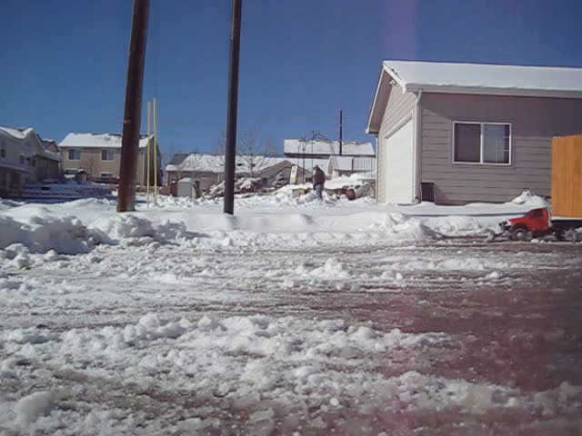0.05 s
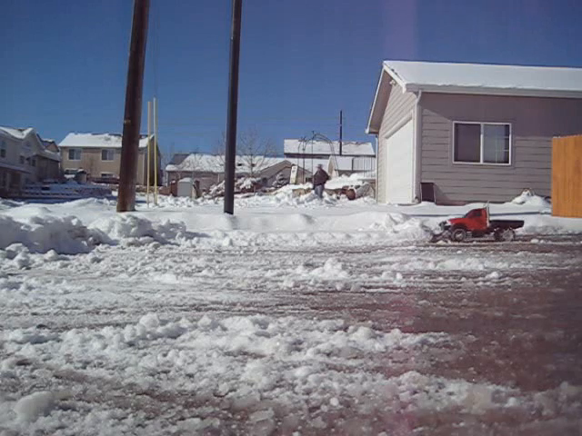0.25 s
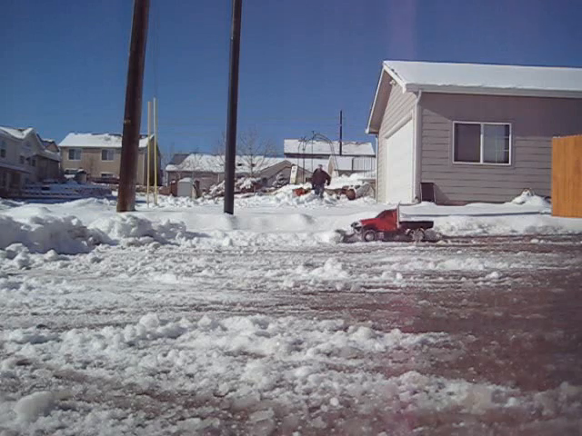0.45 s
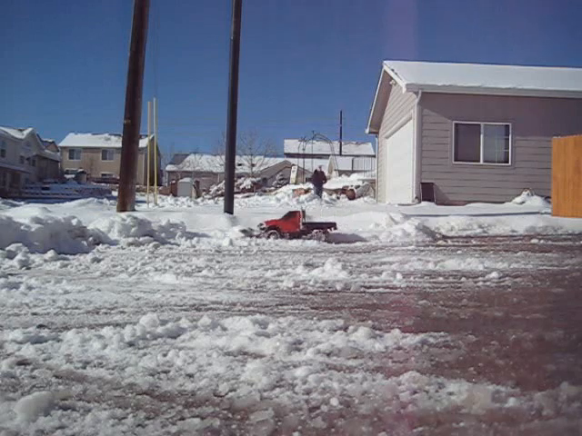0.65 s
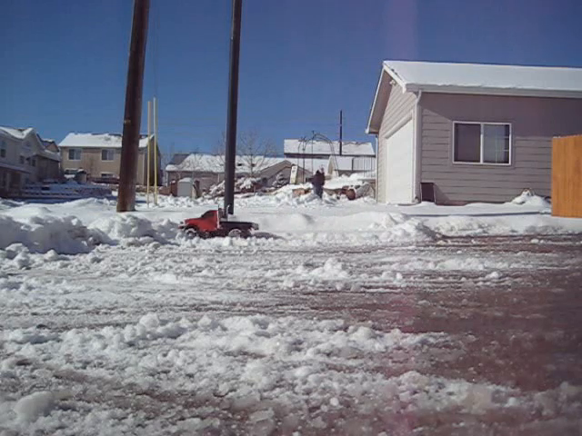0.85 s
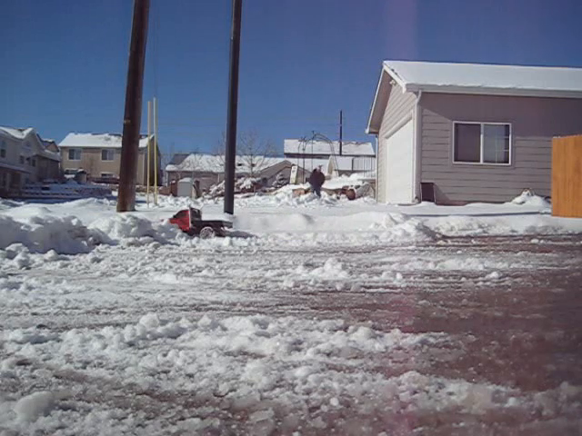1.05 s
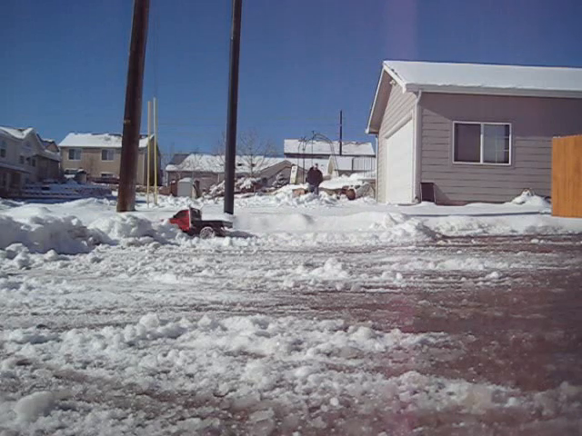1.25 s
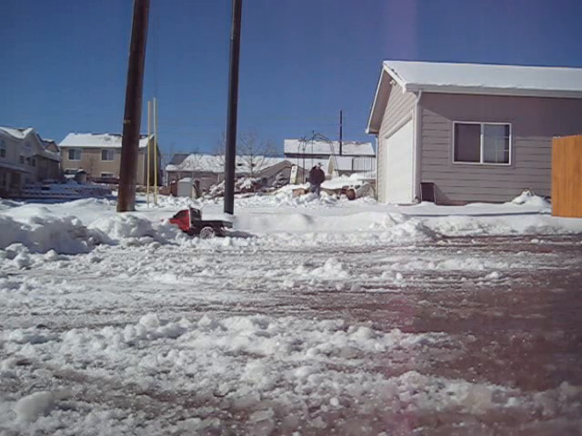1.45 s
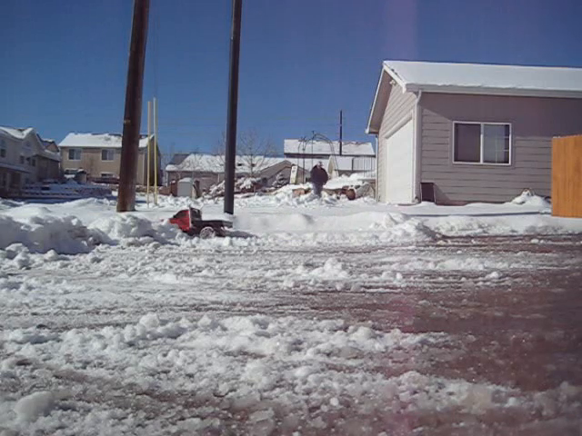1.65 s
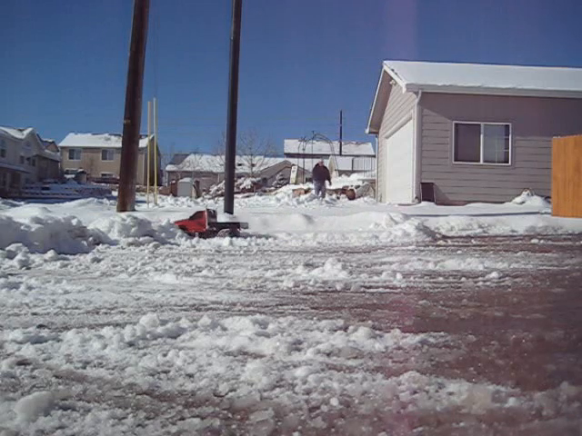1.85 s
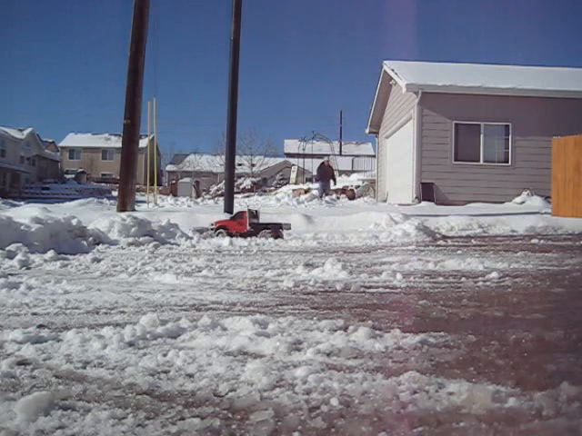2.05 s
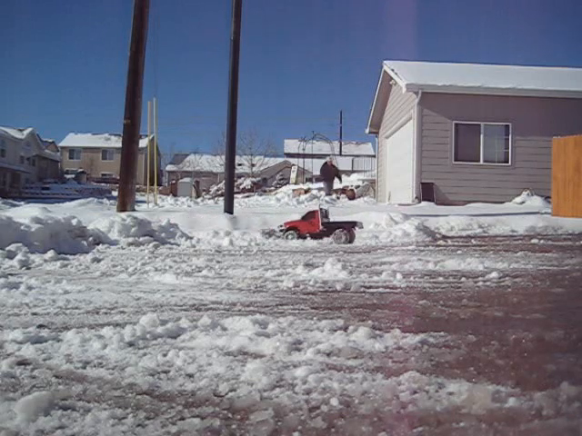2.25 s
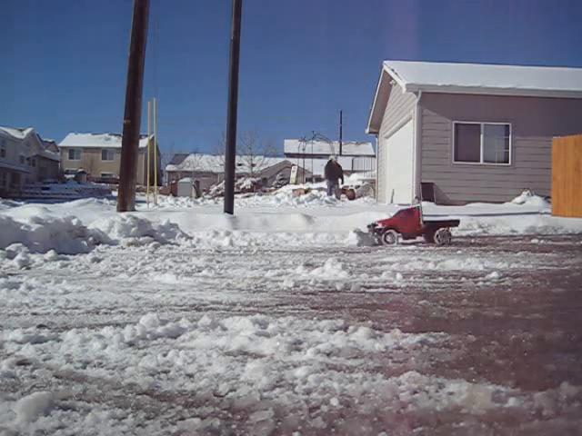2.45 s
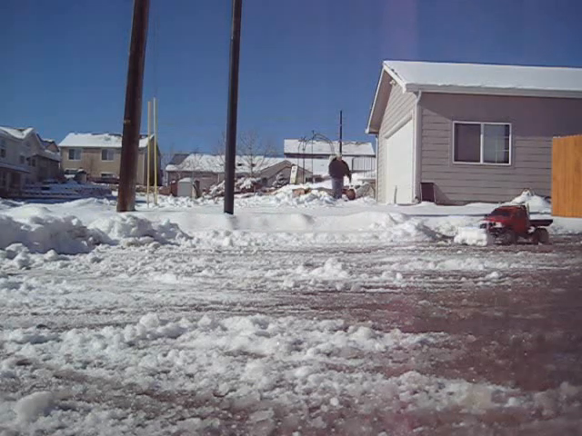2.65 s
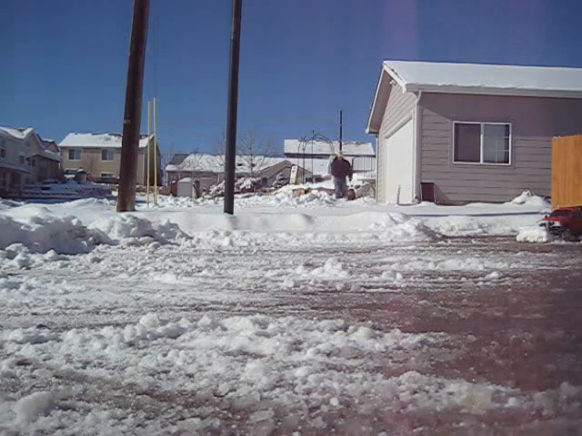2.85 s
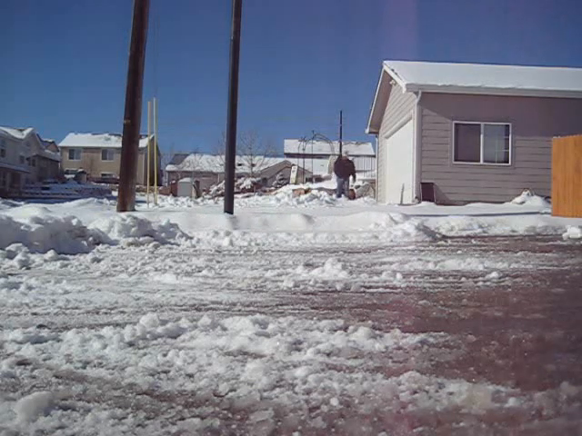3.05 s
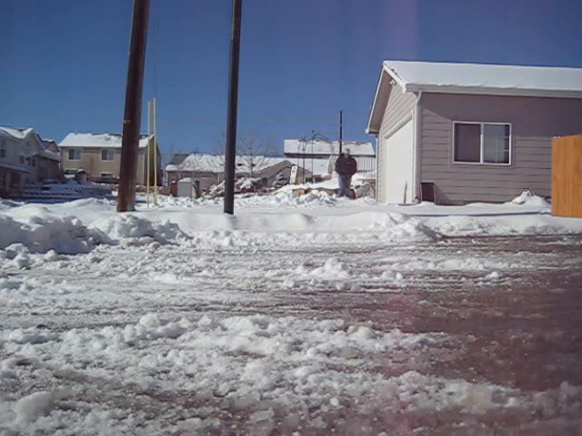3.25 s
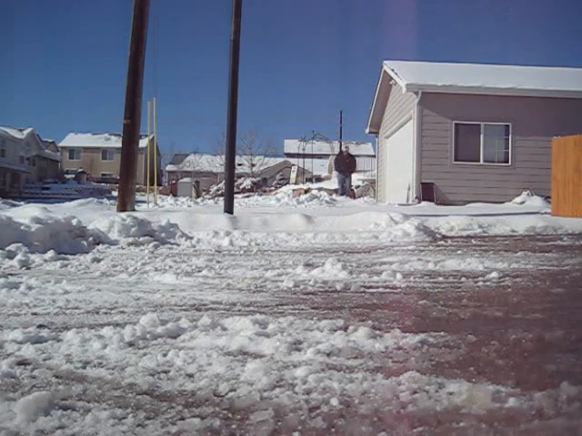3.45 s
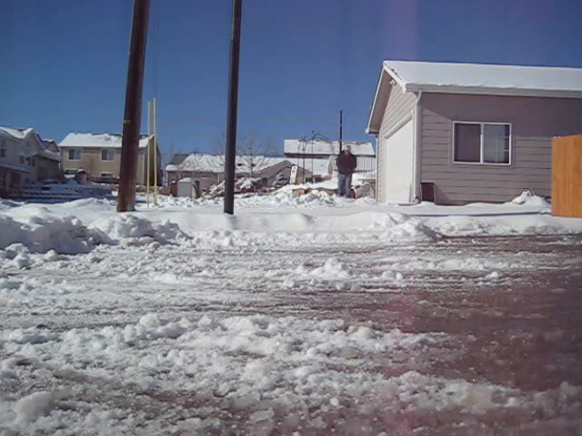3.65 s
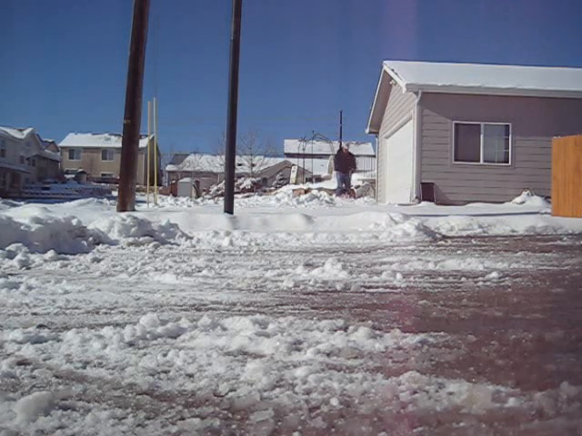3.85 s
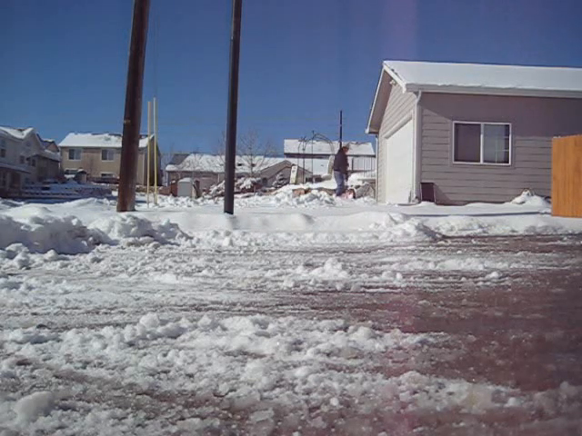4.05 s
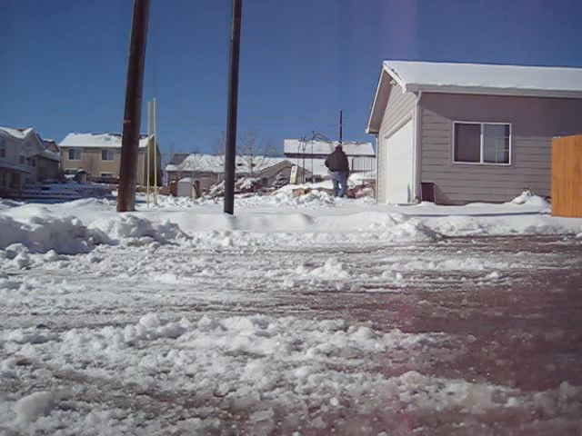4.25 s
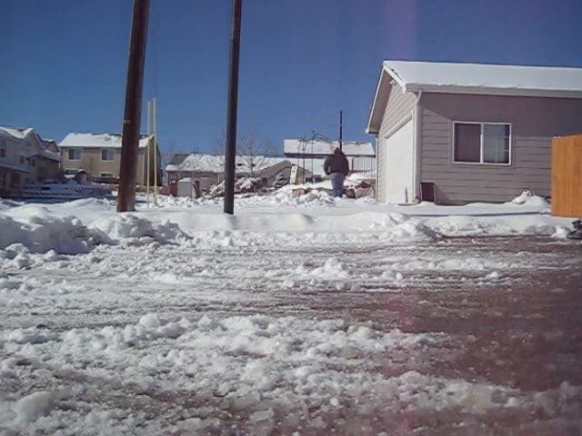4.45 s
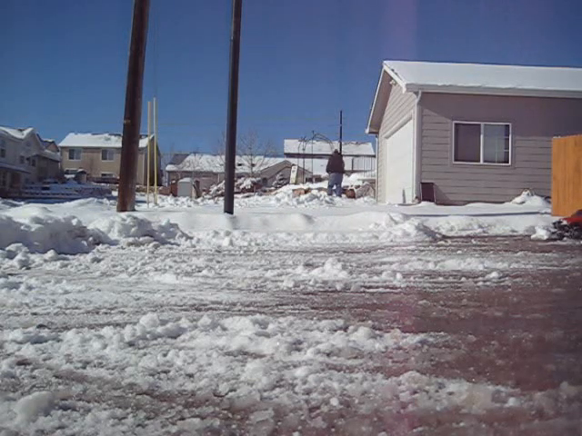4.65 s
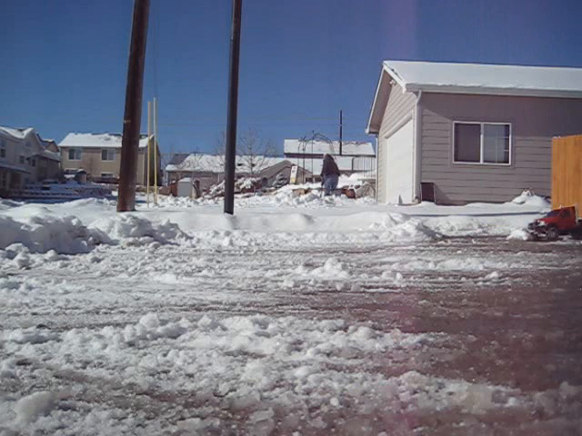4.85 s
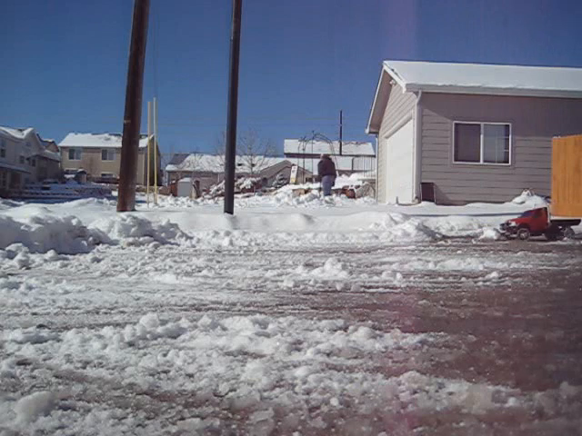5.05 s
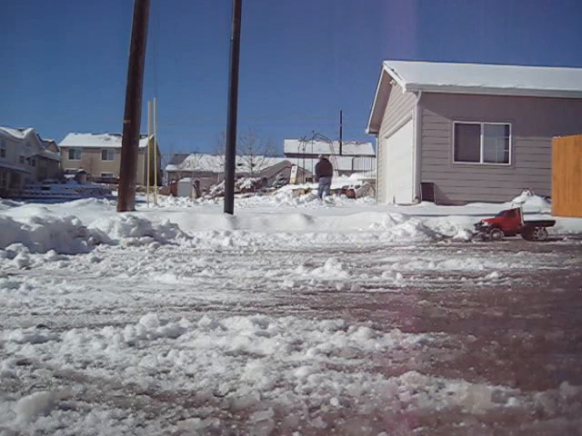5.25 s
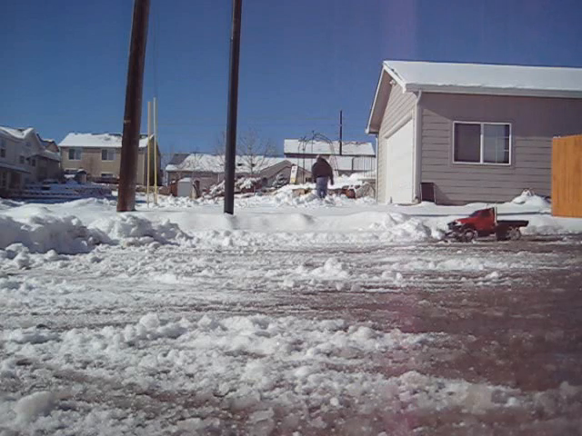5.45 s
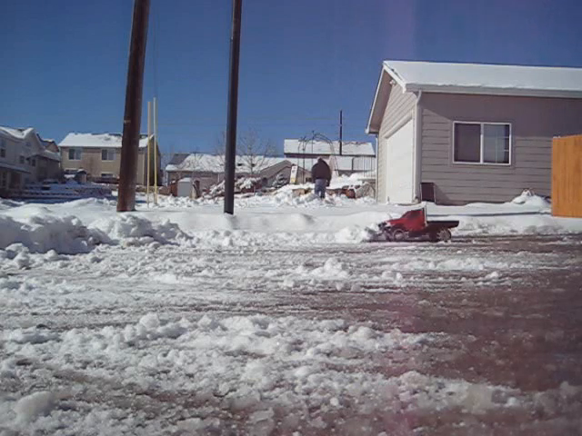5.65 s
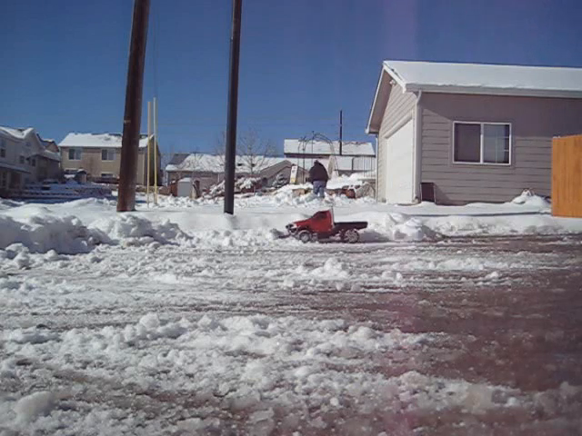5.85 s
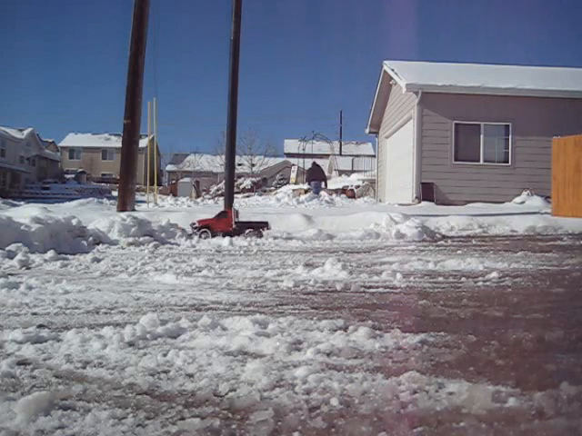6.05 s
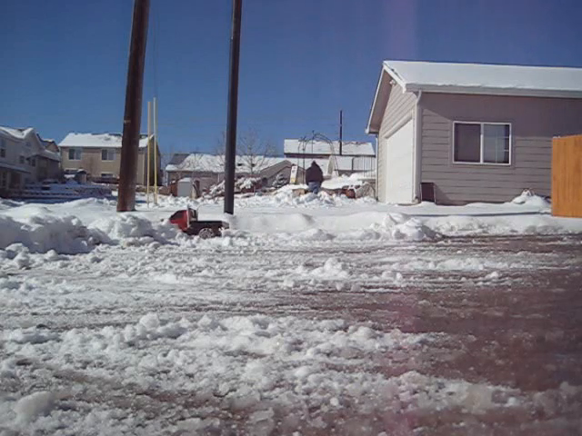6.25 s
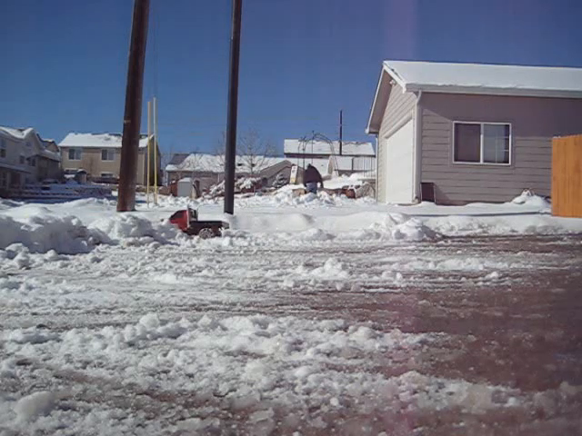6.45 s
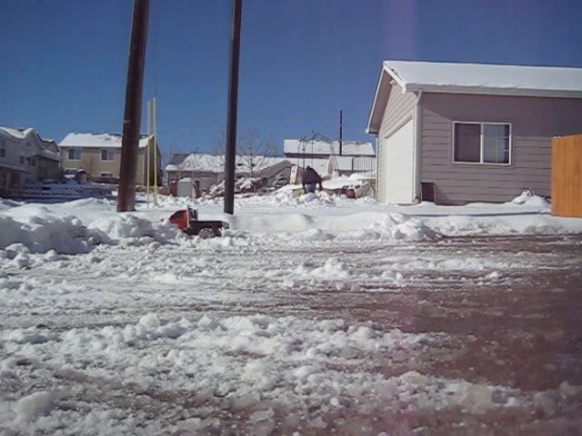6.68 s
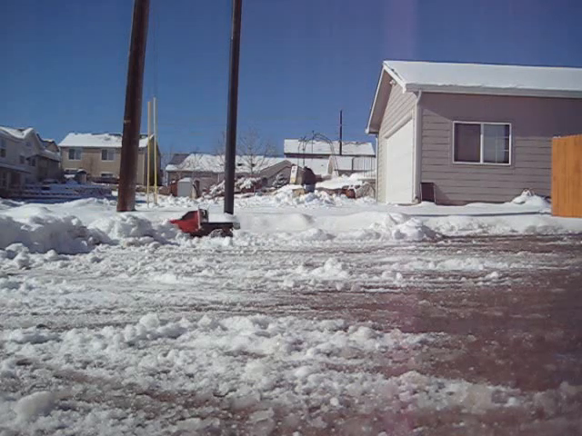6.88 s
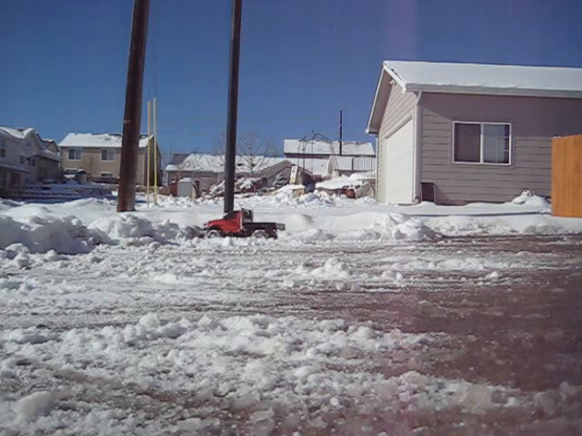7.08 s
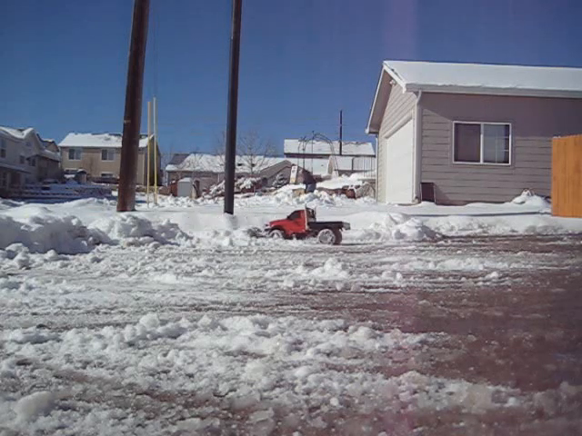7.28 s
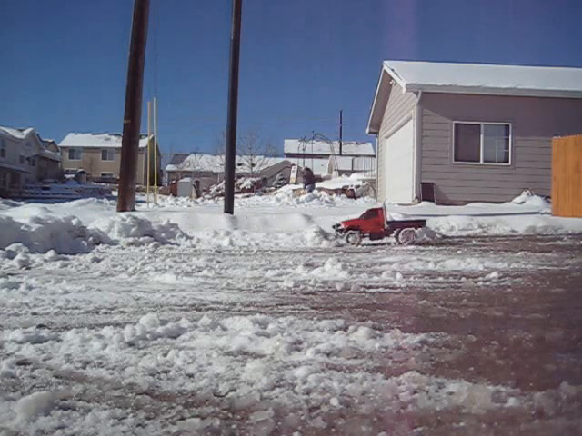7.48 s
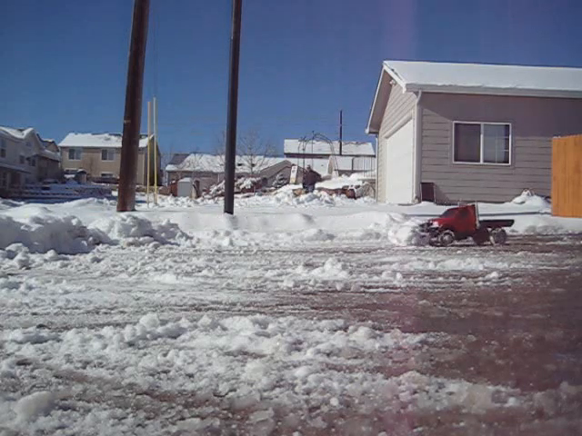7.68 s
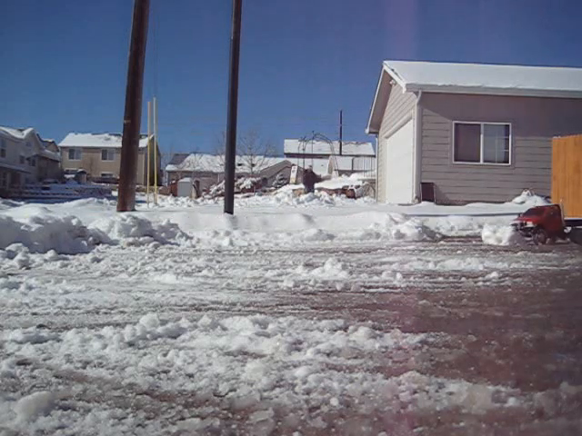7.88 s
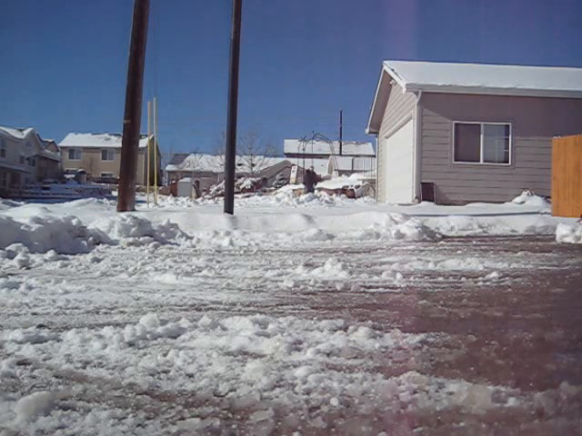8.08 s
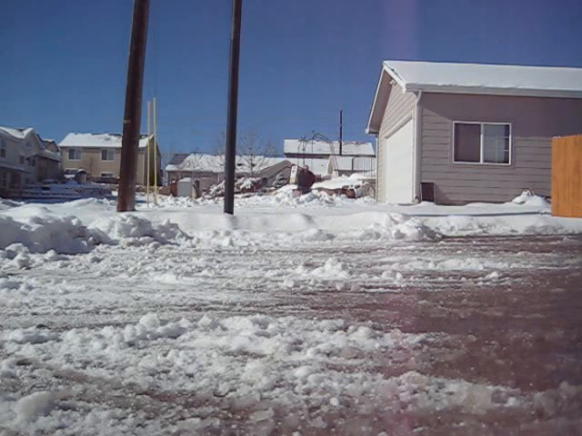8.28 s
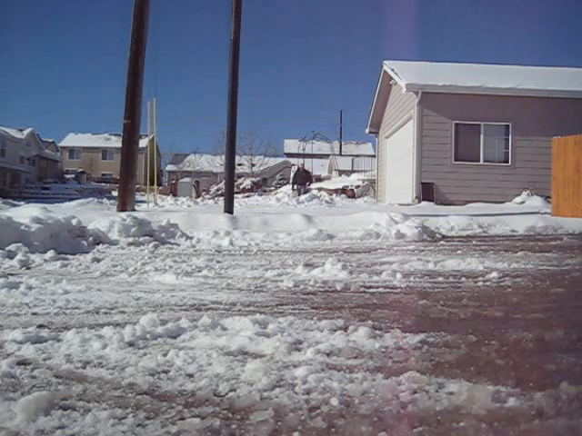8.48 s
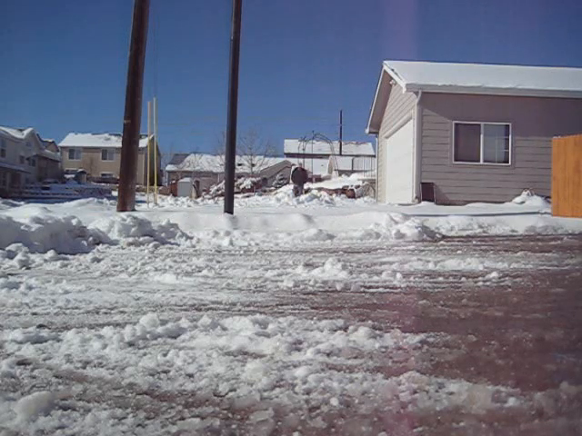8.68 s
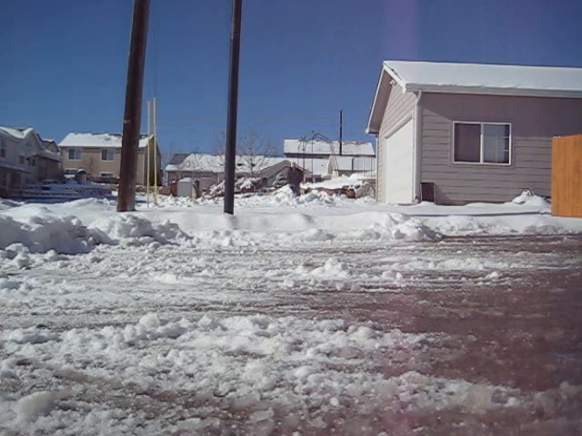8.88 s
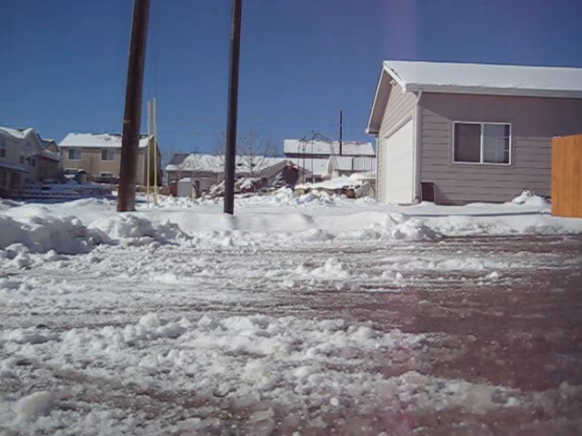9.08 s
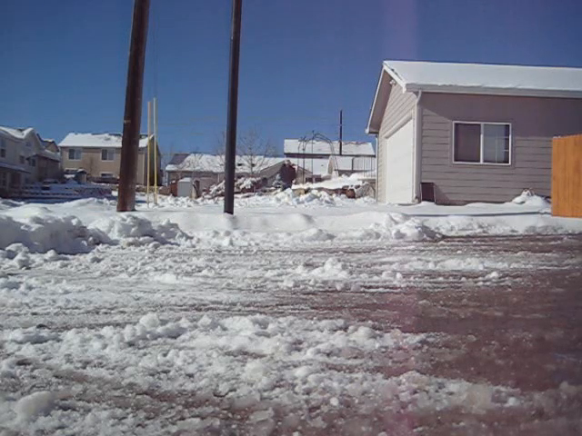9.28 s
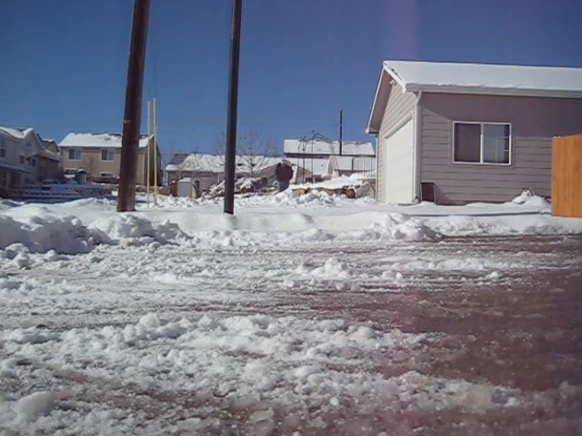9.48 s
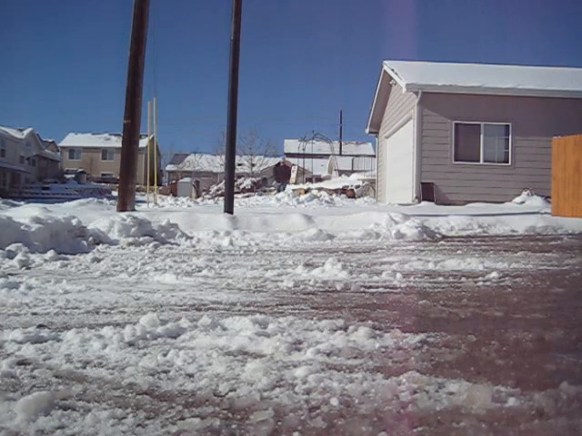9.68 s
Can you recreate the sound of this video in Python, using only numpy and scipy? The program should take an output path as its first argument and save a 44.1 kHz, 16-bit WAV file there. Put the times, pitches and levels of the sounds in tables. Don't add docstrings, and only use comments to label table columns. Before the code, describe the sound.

A small radio-controlled truck whines and rattles through icy slush in bursts, pushing, stopping, creeping with blade knocks, then reversing away over faint outdoor murmur.

```python
import sys
import numpy as np
from scipy import signal
from scipy.fft import rfft, irfft, next_fast_len
from scipy.io import wavfile

SR = 44100
rng = np.random.default_rng(int(sys.argv[2]) if len(sys.argv) > 2 else 0)


def wav_record(signal):
    frames = np.transpose(np.atleast_2d(signal))
    bounded = np.clip(frames, -1, 1)
    quanta = np.round(bounded * 32767).astype(np.int16)
    wavfile.write(sys.argv[1], SR, quanta)


def volts(x):
    e = np.asarray(x, float) / 20
    return 10 ** e


N = 428641
TIME = np.arange(N) / SR

# time in seconds, commutator rate in Hz, hum in dB as the load changes.
MOTOR_RUNS = [
    [(0.27, 830, -45), (0.394, 1260, -43), (0.556, 1345, -39), (0.886, 1330, -35), (1.002, 1252, -47),
     (1.04, 1140, -49)],
    [(1.76, 229.7, -80), (1.852, 990, -54), (1.9, 1075, -50), (2.104, 1179, -37.5), (2.452, 1299, -41),
     (3.072, 1285, -44), (3.126, 1231, -43), (3.266, 1301, -44), (3.5, 950, -46)],
    [(5.56, 644, -69), (5.602, 1030, -42), (5.74, 1306, -40), (6.064, 1357, -38), (6.2, 1215, -49)],
    [(6.88, 141, -67), (7.01, 890, -57), (7.05, 1094, -46), (7.208, 1232, -33), (7.27, 1114, -39),
     (7.285, 985, -53)],
    [(7.285, 1002, -53), (7.36, 990, -45), (7.45, 1229, -35), (7.55, 1245, -36.5), (7.7, 1205, -40),
     (7.76, 1108, -41), (7.85, 1145, -44), (8.17, 1165, -46), (8.185, 1035, -47)],
    [(8.185, 1035, -50), (8.235, 1040, -47), (8.265, 1135, -47), (8.526, 1168, -42), (8.605, 1140, -59),
     (8.615, 1040, -58), (8.665, 965, -60), (8.675, 940, -66)],
]


def rms_one(x):
    return x / np.sqrt(np.mean(x ** 2) + 1e-20)


def in_time(rows):
    s, *columns = np.transpose(rows)
    return [np.interp(TIME, s, column) for column in columns]


def gate(start, end, fade=0.02):
    return np.clip(np.minimum(TIME - start, end - TIME) / fade, 0, 1)


def drift(rate_hz):
    r = np.exp(-2 * np.pi * rate_hz / SR)
    slow = signal.lfilter([1], [1, -2 * r, r * r], rng.standard_normal(N + SR))
    return rms_one(slow[SR:])


def colour(x, spectrum):
    hz, db = np.transpose(spectrum)
    size = next_fast_len(N)
    log_hz = np.log(np.maximum(np.arange(size // 2 + 1) * SR / size, 1))
    outside = np.maximum(np.log(hz[0]) - log_hz, 0) + np.maximum(log_hz - np.log(hz[-1]), 0)
    gain = volts(np.interp(log_hz, np.log(hz), db) - 60 * outside)
    return rms_one(irfft(rfft(x, size) * gain, size)[:N])


def resonate(x, hz, width_hz):
    r = np.exp(-np.pi * width_hz / SR)
    poles = [1, -2 * r * np.cos(2 * np.pi * hz / SR), r * r]
    return signal.lfilter([(1 - r * r) / 2, 0, (r * r - 1) / 2], poles, x)


def butter(x, hz, kind, order=4):
    return signal.sosfilt(signal.butter(order, hz, kind, fs=SR, output="sos"), x)


def rough_tone(turns, clean, width_hz):
    clean = np.clip(clean, 0, 1)
    smear = drift(width_hz) + 1j * drift(width_hz)
    swing = clean + np.sqrt((1 - clean ** 2) / 2) * smear
    return np.sqrt(2) * np.imag(swing * np.exp(2j * np.pi * turns))


def bursts(events, width_share, held, rise_s, length=.025, release=1.):
    out, age = np.zeros(N + 8000), np.arange(8000) / SR
    noises = rng.standard_normal((len(events), len(age)))
    for (s, db, hz, *own_length), noise in zip(events, noises):
        lasts = max(own_length[0] if own_length else length, .004)
        decay = volts(-60 * np.maximum(age - held * lasts, 0) / (release * lasts))
        shape = np.minimum(age / rise_s, 1) * decay
        puff = resonate(noise * shape, hz, width_share * hz)
        out[round(s * SR):][:len(age)] += volts(db) * puff / np.abs(puff).max()
    return out[:N]


def beam(db, best_m, near_loss_db, far_loss_db, reverse_db):
    # time in seconds, distance in m.
    place = [(0, 2.03), (.5, 1.4), (.8, 1.06), (1, 0.58), (1.8, 0.78), (2.25, 0.75), (2.75, 2.02),
             (3.5, 2.5), (3.75, 2.45), (4.2, 3.74), (4.8, 2), (5.5, 1.95), (6, 1), (6.2, 0.91), (6.9, 0.5),
             (7.5, 1.11), (8, 2.3), (8.8, 3.85)]
    # start in seconds, end in seconds.
    reversing = [
        (1.7, 3.2),
        (6.8, 8.7),
    ]
    away = in_time(place)[0] - best_m
    near_db = np.abs(near_loss_db) * np.maximum(-away, 0)
    far_db = np.abs(far_loss_db) * np.maximum(away, 0)
    turned_round = sum(gate(*span, fade=0.026) for span in reversing)
    return db - np.minimum(near_db + far_db, 30) + reverse_db * turned_round


def motor(effort_db):
    shaft_db = [-27.5, -17, -26.5, -34, -33, -23]
    # frequency in Hz, gain in dB.
    whine_out = [(2000, -4), (9000, -6), (10300, -1), (11100, 1), (11700, -6), (12600, 0), (13200, -7),
                 (13800, -20), (14400, -28)]
    half_out = [(4500, -24), (5400, -7), (6200, -7), (6600, 0.5), (7100, 3), (7500, -3)]
    # level in dB above the effort, best place in m,
    # loss in dB per m nearer the bank, loss in dB per m beyond, extra dB in reverse.
    whine_beam = (-4, 4.5, 2.5, 6.5, 1.5)
    half_beam = (-11, 2.6, 2.5, 10.5, 3)
    teeth_per_segment = 10.7
    skirt_db = -15

    gates = [gate(run[0][0], run[-1][0]) for run in MOTOR_RUNS]
    hz, hum_db = in_time(np.vstack(MOTOR_RUNS))
    turns = np.cumsum(hz * (1 + 0.005 * drift(9))) / SR
    hum = rough_tone(turns, clean=.96, width_hz=20)
    hum += volts(-4) * rough_tone(2 * turns, clean=.2, width_hz=90)
    hum += volts(shaft_db) @ gates * rough_tone(turns / 3, clean=1.0, width_hz=7.0)

    mesh_hz = teeth_per_segment * hz * (1 + 0.0097 * drift(14))
    mesh_turns = np.cumsum(mesh_hz) / SR
    whine_db = effort_db + beam(*whine_beam) + np.interp(mesh_hz, *np.transpose(whine_out)) + 0.84 * drift(11)
    whine = rough_tone(mesh_turns, clean=0, width_hz=300)
    skirt = volts(effort_db + skirt_db) * rough_tone(mesh_turns, clean=0, width_hz=1600)
    half_db = effort_db + beam(*half_beam) + np.interp(mesh_hz / 2, *np.transpose(half_out)) + 1.5 * drift(32)
    skirt += volts(half_db) * rough_tone(mesh_turns / 2, clean=0.22, width_hz=160)
    wavering_hum = volts(hum_db) * volts(0.51 * drift(2.9)) * hum
    return sum(gates) * (wavering_hum + volts(whine_db) * whine + skirt), turns / 10


def contacts(per_s, spread_db, smooth):
    sizes = volts(spread_db * np.minimum(rng.exponential(1, N), 3)) * np.clip(rng.standard_normal(N), -2, 2)
    clicks = rms_one(sizes * (rng.random(N) < per_s / SR))
    return clicks + smooth * rng.standard_normal(N)


def rattle(effort_db, gear_turns):
    # frequency in Hz, level in dB per Hz.
    slush = [(180, -55), (300, -18), (440, -17.5), (630, -15), (1280, 0.5), (1600, -3.5), (2200, 0),
             (2860, -20), (4840, -120)]
    chassis = [(1120, -13.5), (1900, -5), (2210, -11), (2520, 0.5), (2780, -3), (3050, -0.5), (4700, -5.5),
               (6110, -15), (10300, -120)]
    gearbox = [(2530, -15), (4300, -8), (5350, -2.5), (6250, -2.5), (6880, 1), (7710, -2), (8800, -3.5),
               (11400, -27), (19400, -120)]
    teeth = [(4880, -55), (8300, -1), (10300, 10), (11700, 3.5), (12600, 7), (13200, 0.5), (15100, 5),
             (15800, -25.5)]
    # frequency in Hz, width in Hz, dB gained per octave of motor speed.
    shell = [(1140, 57, 0), (2596, 310, 6.5), (3222, 360, 30), (5040, 330, 5), (5645, 500, 28),
             (6900, 400, 33), (13000, 260, 4), (9700, 350, -1)]
    # level in dB above the effort, best place in m,
    # loss in dB per m nearer the bank, loss in dB per m beyond, extra dB in reverse.
    part_beams = [
        (-16.5, 0.64, 9, 1, 1.8),
        (-0.5, 0.26, 58, 4, -1.3),
        (-3, 1.27, 15, 2, 0),
        (-4.5, 2, 9.5, 1, 1.5),
    ]
    shell_beams = [(-14, 0.1, 0.2, 6, -20), (-9, .8, 5, 11, 1.5), (-10.5, 1.1, 10, 14, 0.1),
                   (-30, 2.4, 21, 0.2, 18), (-9, 1.3, 5, 6, 3), (-8, 1.05, 1.1, 1.5, 0.1),
                   (-14, 1, 8, 3, 5), (-22, 2.5, 12, 8, 10)]
    # start in seconds, end in seconds.
    coasting = [
        (0.95, 1.4),
        (6.1, 7.1),
    ]
    coast_loss = (-.2, .2, .1, -0.15)
    top_hz, slowest_octaves = 1300, -0.3
    blade_db = 9

    fading_db = np.clip(effort_db + 22, -25, 0) * sum(gate(*span) for span in coasting)
    slush_db, chassis_db, gearbox_db, teeth_db = (
        beam(*row) + share * fading_db for row, share in zip(part_beams, coast_loss))
    slush_db = slush_db + blade_db * gate(4.9, 5.5, fade=0.14)
    lumpy_crawl = gate(4.2, 5.5, fade=.05) * (1.0 * drift(21) + 1.2 * drift(120))
    jolts = volts(effort_db + 0.22 * drift(27) + 0.76 * drift(140) + lumpy_crawl)
    pace = np.maximum(np.log2(in_time(np.vstack(MOTOR_RUNS))[0] / top_hz), slowest_octaves)
    runout = 1 + 0.12 * np.sin(2 * np.pi * gear_turns)

    hits = contacts(per_s=2700, spread_db=1.5, smooth=1.3) * runout
    crunch = contacts(per_s=900, spread_db=-1.5, smooth=1.23)
    out = volts(slush_db + 0.33 * drift(46)) * colour(crunch, slush)
    for db, spectrum in ((chassis_db, chassis), (gearbox_db, gearbox), (teeth_db, teeth)):
        out += volts(db - 1.5 + 0.84 * drift(17.0)) * colour(hits, spectrum)
    for (hz, width_hz, speed_db), row in zip(shell, shell_beams):
        flexing = np.cumsum(hz + min(110, .03 * hz) * drift(5)) / SR
        ringing = rough_tone(flexing, clean=0, width_hz=width_hz) * runout
        mode_db = beam(*row) + speed_db * pace + 0.16 * fading_db
        out += volts(mode_db + 1.5 * drift(2.5) + 1.5 * drift(47)) * ringing
    return jolts * out


def crawl():
    # time in seconds, whine in Hz, whine in dB.
    manoeuvres = [
        [(3.655, 1450, -43), (3.693, 1490, -43), (3.71, 1560, -56), (3.745, 1850, -43), (3.78, 2230, -39),
         (3.815, 2290, -38), (3.825, 2400, -52)],
        [(3.83, 2530, -41), (3.872, 2680, -37), (3.885, 3050, -46), (3.93, 3280, -41), (3.968, 3520, -38),
         (3.99, 3700, -41), (4.03, 3700, -38), (4.07, 3720, -45)],
        [(4.342, 3600, -36), (4.356, 2600, -37), (4.372, 2050, -41), (4.39, 1750, -46), (4.4, 1590, -57)],
        [(4.625, 1690, -48), (4.69, 1880, -39), (4.715, 1702, -44.5), (4.785, 2120, -37), (5.002, 2063, -40.5),
         (5.16, 1820, -43), (5.33, 1860, -41.5), (5.5, 1753, -38)],
        [(5.5, 1758, -39), (5.52, 2000, -36), (5.54, 2650, -28), (5.56, 3600, -29), (5.58, 4300, -36)],
        [(6.876, 1600, -50), (6.905, 1680, -46), (6.916, 2200, -48), (6.927, 3000, -36), (6.938, 3350, -42)],
    ]
    on = sum(gate(part[0][0], part[-1][0], fade=0.0074) for part in manoeuvres)
    hz, whine_db = in_time(np.vstack(manoeuvres))
    turns = np.cumsum(hz * (1 + .014 * drift(55))) / SR
    whine = rough_tone(turns, clean=.88, width_hz=100)
    whine += volts(-8) * rough_tone(2 * turns, clean=.2, width_hz=150)
    return on * volts(whine_db + 1.7 + 1.4 * drift(30)) * whine


def chopper():
    # start in seconds, end in seconds, pitch in Hz, level in dB.
    whistles = [
        (3.6, 3.8, 3925, -45.),
        (4.46, 4.8, 3925, -52.),
        (1.36, 1.48, 9150, -60.),
        (6.34, 6.47, 9150, -60.),
    ]
    out = np.zeros(N)
    for start, end, hz, db in whistles:
        octave = volts(-16) * (hz < 6000) * np.sin(4 * np.pi * hz * TIME)
        out += volts(db) * gate(start, end) * (np.sin(2 * np.pi * hz * TIME) + octave)
    return out


def slips():
    # start in seconds, peak in dB, first pitch in Hz, last pitch in Hz, length in seconds.
    glides = [(1.766, -26, 2700, 2350, 0.015), (1.797, -30, 3020, 2650, 0.014),
              (1.814, -35, 1330, 1300, 0.028), (4.542, -39, 1950, 1750, 0.014),
              (4.543, -39, 2700, 2550, .02), (6.886, -34, 2800, 2550, .022), (6.942, -22, 2300, 2700, .016),
              (7.012, -27, 2400, 2700, .014), (7.04, -24, 2950, 3250, .016), (7.066, -26, 2550, 2650, .016)]
    out = np.zeros(N)
    for s, db, from_hz, to_hz, length in glides:
        part = np.arange(round(length * SR)) / (length * SR)
        cycles = length * part * (from_hz + (to_hz - from_hz) * part / 2)
        tone = np.sin(np.pi * part) ** .5 * np.sin(2 * np.pi * cycles)
        out[round(s * SR):][:len(part)] += volts(db) * tone
    return out


def gear_squeaks():
    # start in seconds, peak in dB, pitch in Hz, length (t60 for the first two) in seconds.
    lash = [(3.564, -13.5, 2800, 0.025), (4.572, -25, 2494, 0.063), (5.548, -31, 2570, 0.056),
            (1.947, -22, 2900, .04), (1.998, -15, 3170, 0.053), (2.03, -15, 2970, .06),
            (2.063, -19, 3025, .04), (2.082, -16, 2576, 0.049), (2.242, -24, 2780, .05),
            (2.28, -30, 2430, 0.079), (2.374, -16, 2494, .06), (2.429, -23, 2460, 0.062),
            (2.54, -14, 3070, .05), (7.103, -19, 3000, .06), (7.172, -16, 2380, 0.058),
            (7.247, -24, 3056, 0.045), (7.358, -26, 2430, .06), (7.6, -18, 3170, 0.062),
            (7.643, -15, 3220, 0.052)]
    squeals = [(0.2823, -12.5, 9900, 0.057), (0.309, -13, 10450, 0.052), (1.8432, -25, 10300, 0.04),
               (3.7487, -23, 9850, 0.038), (3.8252, -21, 9500, 0.034), (3.902, -13, 9850, 0.059),
               (3.9244, -16, 10000, 0.046), (3.9524, -11.5, 10530, 0.053), (3.9853, -15, 10600, 0.041),
               (4.0194, -18, 11100, 0.032), (4.0594, -20, 9830, 0.04)]
    binds = [(4.25, -28, 4900, 0.027), (4.34, -24, 9200, 0.036), (4.54, -23.5, 7450, 0.04),
             (4.61, -29, 7500, 0.019), (4.625, -22, 6900, .03), (4.625, -26, 10000, 0.025),
             (4.68, -21, 7500, .025), (4.695, -27, 9900, 0.045), (4.725, -22, 7200, .02),
             (4.85, -26.5, 4300, .12), (4.89, -27, 6900, .09), (5.09, -25.5, 6900, 0.098),
             (5.28, -26, 7000, .06), (5.35, -25.5, 7100, 0.12), (5.31, -28, 4600, .06),
             (5.54, -15, 7300, 0.036), (7.78, -15, 6804, 0.13), (7.91, -14, 9700, .07),
             (3.955, -24, 2540, .02), (3.79, -25, 4500, .025)]
    out = bursts(lash, width_share=0.12, held=0.033, rise_s=0.0032)
    out += bursts(squeals, width_share=0.016, held=0.31, rise_s=0.0029)
    return out + bursts(binds, width_share=.05, held=0.76, rise_s=0.0075)


def blade_knocks():
    # start in seconds, peak in dB, centre in Hz, length in seconds.
    lumps = [(1.173, -36, 850, 0.029), (4.815, -25.5, 988, 0.026), (4.865, -27, 855, 0.026),
             (4.934, -26, 890, 0.053), (5.026, -26.5, 1170, 0.031), (5.107, -28, 1160, 0.038),
             (5.193, -24.5, 1148, 0.028), (5.363, -27, 1095, 0.035), (5.4, -23.5, 1160, 0.028),
             (6.43, -33, 1490, 0.023), (6.47, -36, 950, 0.023), (6.499, -35, 1100, .025),
             (6.533, -35, 1010, 0.057), (6.59, -35, 1030, 0.032), (6.669, -34, 895, 0.062),
             (6.742, -19, 930, 0.041), (6.79, -29.5, 1000, 0.032), (8.696, -28.5, 1411, 0.017),
             (8.832, -30.5, 1140, 0.015), (8.924, -29, 1120, 0.017), (8.943, -31, 1250, 0.02),
             (8.962, -32, 1160, 0.019), (9.003, -35, 990, 0.022), (9.038, -37, 1050, .025)]
    # multiple of the centre frequency, level in dB, width as a share of the frequency.
    modes = [(1, -1.5, 0.23), (1.48, -6.5, 0.31), (2.05, -10, .15), (3, -10, 0.99)]
    knocks = sum(volts(db) * bursts(np.array(lumps) * [1, 1, ratio, 1],
                                  width_share=share, held=.9, rise_s=.001, release=.5)
                 for ratio, db, share in modes)
    return butter(knocks, 590, "high")


def rut_thumps():
    # start in seconds, peak in dB, centre in Hz, length in seconds.
    ruts = [
        (0.187, -32, 275, 0.026),
        (0.406, -27.5, 272, 0.015),
        (2.798, -30, 462, 0.039),
        (3.399, -39, 312, 0.067),
        (7.899, -38, 349, 0.046),
    ]
    return bursts(ruts, width_share=2.3, held=0.72, rise_s=0.0045)


def crust():
    # start in seconds, peak in dB, centre in Hz.
    cracks = [(0.136, -2, 10900), (0.3727, 3, 6700), (1.3269, -27, 5670), (1.5905, -20, 7500),
              (1.875, -12, 3530), (1.889, -20, 4200), (1.911, -24, 5000), (3.9514, -22, 10500),
              (3.4126, -4, 4900), (3.462, -7, 5800), (3.566, -18, 6490), (3.579, -19, 5000),
              (4.11, -10, 11000), (4.1394, -6, 10500), (4.146, -9, 10400), (4.352, -9, 6000),
              (4.2215, -13, 11500), (4.392, -18, 4970), (4.406, -20, 11000), (4.5215, -20, 10260),
              (4.672, -15, 10000), (4.9032, -16, 6870), (5.0558, -7, 9000), (5.2284, -16, 6970),
              (5.452, -9, 8900), (4.4473, -16, 11900), (4.501, -12, 9940), (4.6554, -2, 7000),
              (4.7563, -22, 4540), (4.7735, -12, 9700), (4.8045, -6, 8000), (4.8519, -11, 6006),
              (6.558, -16, 12000), (6.8965, -19, 11000), (6.9155, -6.5, 5900), (7.1796, -22, 13000),
              (8.8583, -14, 6340), (8.9044, -18, 6340), (9.2807, -15, 8500), (9.2883, -10, 3470),
              (9.332, -24, 8900), (9.4878, -14.5, 9900), (9.497, -22, 2000), (9.5372, -16, 14000),
              (9.6305, -26, 4740)]
    ticks = [(1.318, -36, 3800), (1.462, -35, 6000), (1.501, -33, 7060), (1.582, -31, 2400),
             (1.608, -31, 10000), (1.651, -36, 9700), (6.358, -35, 9000), (6.83, -41, 3880),
             (9.232, -44, 2000), (9.565, -31, 3000), (9.638, -37, 8000), (9.711, -26, 5000)]
    # start in seconds, peak in dB, centre in Hz, length in seconds.
    sifting = [(1.448, -33, 7000, 0.016), (1.572, -36, 7000, 0.029), (9.3, -34, 9500, 0.11),
               (9.385, -36, 9500, 0.075), (9.49, -36, 4000, 0.1), (9.69, -29.5, 4450, 0.04),
               (8.688, -13, 5500, 0.015), (8.736, -19, 6060, 0.011)]
    snaps = volts(-2.5) * bursts(cracks, width_share=.9, held=0, rise_s=.0002, length=.004)
    snaps += bursts(ticks, width_share=.9, held=0, rise_s=.0002, length=.006)
    crumbs = volts(-14) * bursts(cracks, width_share=.8, held=0, rise_s=.002, length=.05)
    crumbs += bursts(sifting, width_share=.5, held=.8, rise_s=.015, release=.6)
    return butter(snaps + crumbs, 950, "high", order=2)


def yard():
    # frequency in Hz, level in dB.
    murmur = [(15, -51), (25, -20), (96, -9), (174, -3), (255, -6.5), (654, -8.5), (857, -4.5),
              (1010, -3.5), (1150, -4.5), (2030, -4), (2330, -6), (5500, -13.5), (9990, -15), (14600, -11),
              (15800, -13)]
    # time in seconds, half length in seconds, rumble in dB and drone in dB above rest.
    cars = [(.3, .3, 4, 10.5), (1.25, 0.71, 4, 7), (1.952, 0.31, 11, 7.5), (2.752, 0.11, 3, 11),
            (3.409, 0.1, 12, 12), (5.699, .3, -8, -2), (6.898, 0.32, 4, -5), (8.401, 0.7, -6, 7)]
    # pitch in Hz, start in seconds, end in seconds, level in dB.
    machinery = [(274, -1, 2.8, -60), (274, 5.8, 11, -63), (385, 5.8, 8.9, -64), (235, .2, 2.1, -64),
                 (105, .8, 2.1, -63)]
    murmur_db, rumble_rest_db, drone_rest_db = -40.5, -65, -57

    swells = sum(np.outer(rise_db, np.exp(-((TIME - s) / half) ** 2)) for s, half, *rise_db in cars)
    rumble_db, drone_db = swells + np.array([[rumble_rest_db], [drone_rest_db]])
    rumble = rms_one(butter(rng.standard_normal(N), [55, 150], "band", order=2))
    drone = rms_one(butter(rng.standard_normal(N), [160, 480], "band", order=1))
    hum = sum(volts(db) * gate(start, end, fade=0.79) * rough_tone(hz * TIME, clean=1.0, width_hz=4.4)
              for hz, start, end, db in machinery)
    hiss = butter(colour(rng.standard_normal(N), murmur), 146, "high", order=1)
    out = volts(murmur_db - 3 + 1.0 * drift(1.6) + 0.45 * drift(29)) * hiss
    return out + volts(rumble_db - 2.5) * rumble + volts(drone_db - 4.0) * drone + hum


def scene():
    # time in seconds, effort in dB.
    effort = [
        [(0.0, -21), (0.108, -24), (0.348, -17), (0.612, -19), (0.948, -21.5), (1.114, -38.5), (1.13, -56),
         (1.16, -61)],
        [(1.68, -53), (1.795, -28.5), (1.89, -26), (2.37, -20), (3.324, -19), (3.46, -21.5), (3.558, -28),
         (3.57, -22.5), (3.63, -38)],
        [(3.66, -39.5), (3.762, -28), (3.936, -22.5), (4.152, -19.5), (4.16, -21), (4.316, -28), (4.344, -22.5),
         (4.42, -32.5)],
        [(4.45, -30), (4.464, -32), (4.648, -31), (4.654, -24.5), (4.704, -30.5), (4.798, -28), (5.2, -29),
         (5.5, -29.5)],
        [(5.52, -26), (5.56, -17.5), (5.76, -18), (6.09, -20.5), (6.27, -34), (6.314, -57), (6.33, -68)],
        [(6.86, -41.5), (6.93, -30), (7.01, -25.5), (7.18, -23.5), (7.3, -24.5), (7.5, -19.5), (8.65, -21.5),
         (8.87, -31), (9.06, -53)],
    ]
    effort_db, = in_time(np.vstack(effort))
    drive, gear_turns = motor(effort_db)
    near = drive + crawl() + chopper() + slips() + gear_squeaks()
    near += blade_knocks() + rut_thumps() + crust()
    echo = np.roll(signal.lfilter([.4], [1, -.6], near), round(0.02 * SR))
    mono = near + volts(-11.0) * echo + rattle(effort_db, gear_turns) + yard()
    return np.tile(mono, (2, 1))


def low_pass(x):
    return signal.sosfilt(signal.butter(12, 16690, fs=SR, output="sos"), x)


def record(dry):
    rounded = .8 * np.tanh(dry / .8)
    top_cut = signal.ellip(12, .3, 75, 15520, fs=SR, output="sos")
    mix = signal.sosfilt(top_cut, rounded)
    return low_pass(mix)


dry = scene()
out = record(dry)
wav_record(out)
```